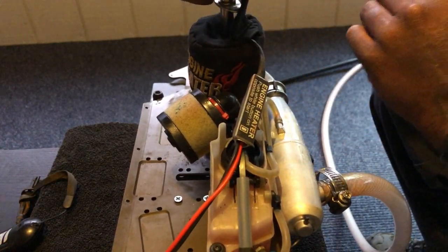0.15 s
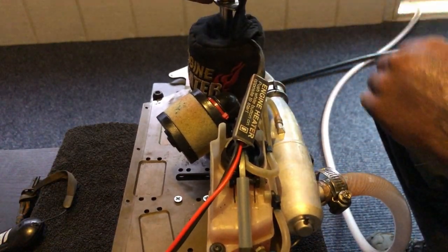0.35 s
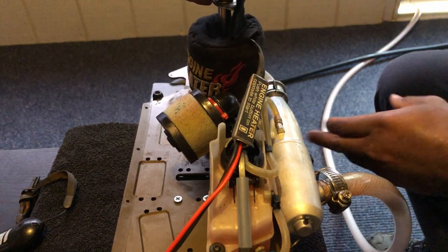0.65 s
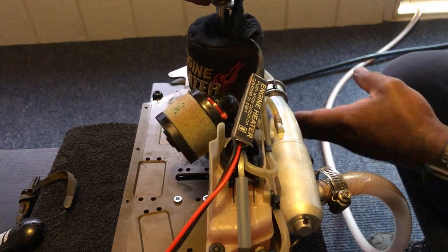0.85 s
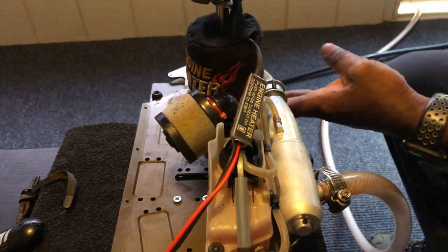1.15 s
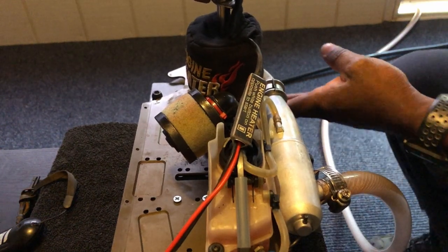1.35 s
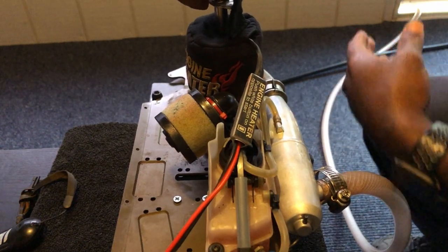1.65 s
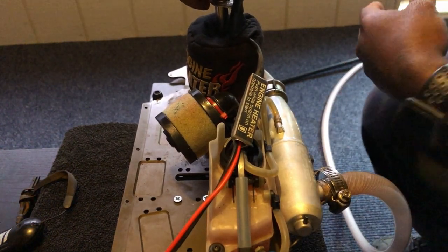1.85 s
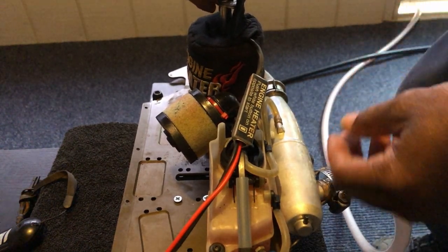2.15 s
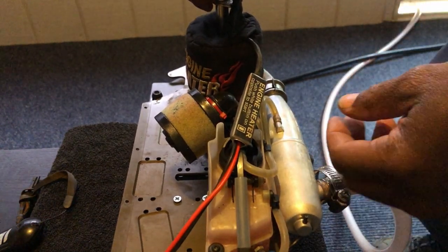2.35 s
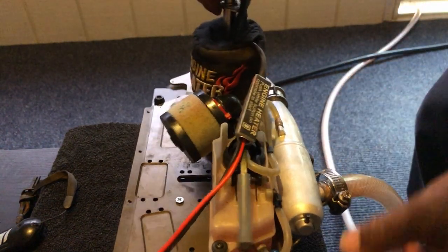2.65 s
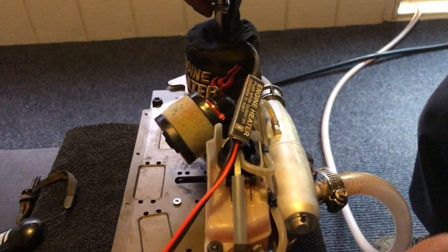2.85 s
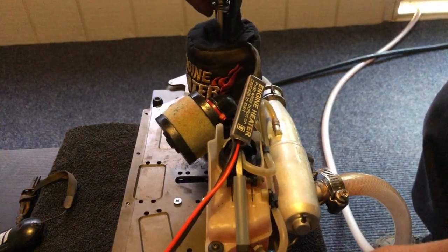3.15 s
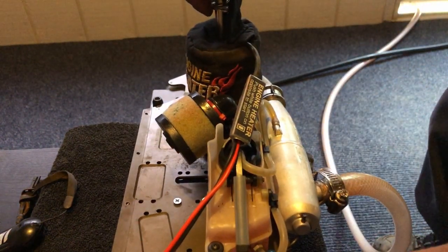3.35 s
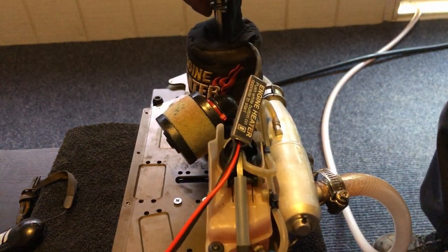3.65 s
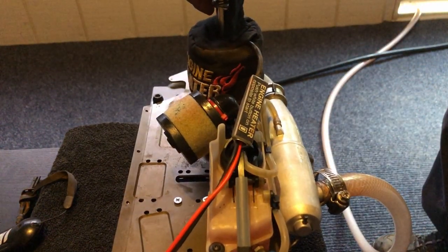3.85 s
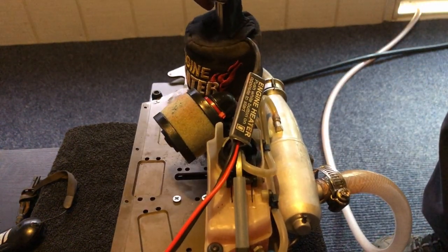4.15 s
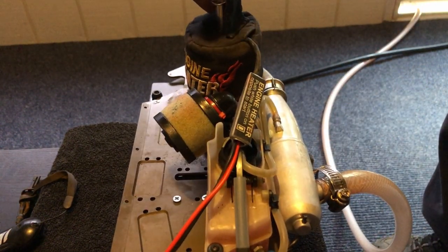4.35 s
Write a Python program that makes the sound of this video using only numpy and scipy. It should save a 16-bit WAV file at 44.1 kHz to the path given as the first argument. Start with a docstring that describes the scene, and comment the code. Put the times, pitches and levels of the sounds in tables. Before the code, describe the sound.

Low microphone knocks, finger taps and a metal snap, then an electric starter noisily cranks a small engine and whines down.

```python
"""In a small room, close by: a hand fiddles with a small model-boat engine, bumping the microphone.
Fingers tap and rustle and a metal part snaps home, over air noise and a faint beating hum.
The background drops; a hand-held electric starter bites and cranks the engine for over a second, gears clacking.
It lets go: the engine groans and clatters to a stop while the freed motor whines down.
Shaped noise gives the contacts and air, resonances the bodies, and speed-locked tones the teeth and motor."""
import sys
import numpy as np
from scipy import signal
from scipy.fft import rfft, irfft
from scipy.io import wavfile
from scipy.ndimage import uniform_filter1d

SR = 44100
rng = np.random.default_rng(int(sys.argv[2]) if len(sys.argv) > 2 else 0)


def to_wav(s):
    """Save 16-bit WAV."""
    ch = np.atleast_2d(s).T  # columns
    pcm = np.round(np.clip(ch, -1, 1) * 32767)  # PCM
    wavfile.write(sys.argv[1], SR, pcm.astype(np.int16))


N = 198468
TIME = np.arange(N) / SR  # s

# Air noise of the place: (frequency [Hz], level [dB])
AIR_COLOUR = [(41, -48.5), (70, -6), (126, -11.5), (186, -14), (262, -13), (286, -14), (336, -19),
              (541, -19), (1070, -27.5), (1230, -26.5), (3000, -37), (3900, -36.5), (5500, -38),
              (8280, -37.5), (12000, -42.5), (16000, -46)]
AIR_DB = -49
# Two hum tones that beat: (frequency [Hz], rms level [dB])
HUM = [(243.2, -50), (267.5, -47)]
# Faint wavering whines in the room: (frequency [Hz], width [Hz], rms level [dB])
ROOM_WHINES = [(1225, 7, -70.5), (1645, 35, -69.5), (5798, 20, -78)]
# Decay of the room's reflections: (frequency [Hz], 60 dB decay time [s])
ROOM_DECAY = [(200, 0.25), (1000, 0.15), (7000, 0.2), (15000, 0.35)]
HUSH_START = 2.018  # s

# Rumble at the microphone: (frequency [Hz], level [dB])
RUMBLE_COLOUR = [(5.9, -38.5), (10, -2), (20, 7.5), (29, -15), (41, -7), (59, -23), (120, -38),
                 (160, -56.5), (260, -120)]
# The microphone sways in the hand: (time [s], level [dB], rise [s], fade [s])
SWAYS = [(.34, -16.5, 0.038, 0.071), (.55, -12, 0.075, .13), (.82, -23, 0.089, 0.15),
         (1.28, -22, 0.1, 0.16), (1.44, -14.5, 0.06, 0.06), (1.74, -26, 0.078, 0.085),
         (2.38, -29, 0.15, .12), (3.16, -19, 0.045, 0.067), (3.34, -27.5, 0.047, 0.1),
         (3.82, -24, 0.084, .05), (4.25, -39, 0.16, 0.17)]
SWAY_FLOOR_DB = -41.5
# Low knocks on the microphone: (time [s], level [dB], half-length [s])
KNOCKS = [(0.351, -7.5, 0.012), (0.388, -11, 0.0075), (0.44, -21, .008), (0.524, -13, 0.005),
          (0.556, -7.5, 0.0074), (0.574, -13, 0.0038), (0.625, -15, .008), (0.664, -11, .015),
          (0.785, -25, 0.0058), (1.224, -19, .012), (1.419, -8, 0.008)]

# A metal part snaps home and bounces: (time [s], relative level [dB])
SNAP = [(1.2152, -8.5), (1.2164, -22), (1.2181, -15.5), (1.2200, -13.5)]
# Bright contact of the snap: (frequency [Hz], level [dB])
SNAP_COLOUR = [(410, -50), (700, -18.5), (1560, -22), (3940, -16), (4920, -18.5), (5540, -10), (6150, -16),
               (7890, 3.5), (9230, -18), (10300, -6.5), (10900, -20), (12200, -16.5), (13500, -9.5),
               (14600, -20), (16000, -16.5)]
# Frame ringing under the snap: (frequency [Hz], width [Hz], level [dB])
SNAP_BODY = [(420, 39, -6.5), (540.4, 27, 1), (1260, 60, -4.5), (2094, 82, -8)]
# Longer echo of the snap: (frequency [Hz], level [dB])
SNAP_ECHO = [(410, -30), (700, -10), (934, -18), (1140, -2), (1480, -15.5), (1870, -8.5), (2770, -15.5),
             (7490, -1.5), (12000, -16), (13500, -11), (14600, -20), (16000, -21)]
# Small finger taps: (time [s], relative tick level [dB], relative thud level [dB])
TAPS = [(0.047, -46, -62), (0.163, -51, -65), (0.7133, -50, -56), (1.074, -53, -63), (1.521, -47.5, -62),
        (1.698, -46, -39), (1.881, -36, -47), (1.99, -62, -46)]
# Tick of a light tap: (frequency [Hz], level [dB])
TICK_COLOUR = [(400, -0.5), (1500, -9.5), (3000, -6), (9000, -16), (15000, -20.5)]
# Thud of the tapped frame: (frequency [Hz], level [dB])
THUD_COLOUR = [(250, -13.5), (540, 1), (800, -9), (1300, -14), (2500, -25), (5000, -50)]
# Sleeve and hand rub: (time [s], relative level [dB], rise [s], fade [s])
RUBS = [(.04, -61, 0.017, 0.018), (.36, -58, 0.017, .15), (.54, -57, .08, 0.027), (.72, -54, .01, 0.035),
        (1.378, -47.5, 0.029, 0.12), (1.82, -46, 0.098, 0.065), (1.89, -37.5, 0.011, 0.057)]
# Rustle of the rub: (frequency [Hz], level [dB])
RUSTLE_COLOUR = [(180, -12.5), (300, -2.5), (870, -5.5), (1030, -7.5), (1320, -7), (3130, -14.5),
                 (4400, -16.5), (5500, -19), (9090, -21), (16000, -42.5)]
# A sleeve swishes past: (time [s], level [dB], rise [s], fade [s])
SWISH = (0.42, -56.5, 0.06, .17)
# Tone of the swish: (frequency [Hz], level [dB])
SWISH_COLOUR = [(1500, -14.5), (4000, -3), (8500, 1.5), (12000, -5.5), (16000, -14)]

# Faint ticks as the starter is lined up: (time [s], level [dB])
LINING_UP_TICKS = [(2.118, -64), (2.231, -61), (2.507, -66), (2.534, -60), (2.56, -56)]
# The coupling touches, skids and slips under load: (time [s], level [dB], rise [s], fade [s])
SKIDS = [(2.572, -44, .0005, 0.005), (2.594, -47, 0.0058, .006), (2.599, -40, .001, .005),
         (2.609, -34.5, 0.004, 0.011), (2.632, -34.5, 0.0092, 0.0069), (2.671, -24.5, .0007, 0.005),
         (2.678, -25, .0007, .003), (2.692, -26, .0007, .003), (2.9, -26, 0.012, 0.016)]
# Scrape of the skidding coupling: (frequency [Hz], level [dB])
SKID_COLOUR = [(150, -12), (500, 10.5), (900, 6.5), (1800, -4.5), (3200, -3), (5000, -8), (8500, -5.5),
               (11000, -15), (16000, -17)]
# The starter bites: (time [s], relative level [dB])
JOLTS = [(2.649, -29.5), (2.663, -17), (2.672, -16.5), (2.677, -10.5), (2.681, -13), (2.692, -11.5),
         (2.706, -18), (2.76, -16)]
# Body of the jolts: (frequency [Hz], level [dB])
JOLT_COLOUR = [(88, -56), (150, -5), (286, -12.5), (475, 3.5), (716, 1), (960, -22.5), (1260, -7.5),
               (2020, -24), (3220, -22), (3550, -60), (4080, -21), (9080, -25.5), (16000, -41)]
# The coupling squeals as it takes up the load: (time [s], pitch [Hz], level [dB])
SQUEAL = [(2.69, 7020, -57), (2.705, 7600, -41), (2.725, 8400, -33), (2.745, 9130, -38), (2.76, 9400, -43),
          (2.82, 8900, -49)]

BITE_S, LET_GO_S, FREE_S = 2.664, 3.925, 3.968  # the starter bites, is let go, spins free
BITE_RISE_S = 0.0071
GRIP_S, RELEASE_S = 0.064, 0.028  # the drive tones build up and die away
# Cranking speed: (time [s], tooth rate [teeth/s])
SPEED = [(2.75, 118.8), (2.772, 123.3), (2.8, 126.1), (2.83, 127.0), (2.872, 125.4), (3.024, 129.4),
         (3.118, 133.4), (3.162, 134.2), (3.292, 133.4), (3.356, 134.4), (3.434, 136.8), (3.506, 141.5),
         (3.564, 144.3), (3.782, 150.8), (3.838, 151.6), (3.89, 153.9), (3.91, 153.6)]
SPIN_UP_HZ_PER_S, BRAKE_HZ_PER_S = 340, 700  # tooth rate gained after the bite, lost after letting go
MID_SPEED_HZ = 135  # tooth rate
TEETH = 9  # per turn of the shaft
BLOW_DECAY = 0.22  # share of a tooth period
# Broad growl of the housing: (frequency [Hz], level [dB])
HOUSING_COLOUR = [(53, -19), (90, -8), (135, -20), (199, -7), (254, -12.5), (305, -3), (433, 1.5),
                  (647, 2.5), (817, -1), (1160, -3.5), (1450, -8.5), (1630, -12.5), (2000, -23),
                  (2600, -31), (4400, -120)]
GROWL_DB, GROWL_DB_PER_OCTAVE = -36.5, -10  # at mid speed; the engine labours less as it frees up
GROWL_FADE_S = 0.07  # the housing falls quiet once the load is off
# Housing resonances: (frequency [Hz], width [Hz], level [dB])
HOUSING_MODES = [(135, 92, -38), (242.5, 63, -41), (374.5, 25, -38), (435, 35.6, -34), (470, 17, -36),
                 (507.6, 32, -35.5), (588, 33, -33), (634, 27, -38.5), (667.5, 44, -35.5), (752, 58, -44.5),
                 (890, 90, -48.5), (1120, 52, -41.5), (1315, 160, -47), (1614, 106, -43.5),
                 (1740, 190, -45), (2250, 90, -53), (2513, 76, -51.5), (2970, 250, -53.5),
                 (3700, 130, -50.5)]
# Broad colour of the gears: (frequency [Hz], level [dB])
GEAR_COLOUR = [(590, -36), (1000, -14.5), (1160, 5), (1470, -22), (1650, 0), (1910, -6), (2470, 0),
               (4360, -7.5), (4520, -9), (5130, -2.5), (5500, -6.5), (8450, -10), (9490, -8.5),
               (11600, -9.5), (16000, -16.5)]
# Gear-case resonances: (frequency [Hz], width [Hz], level [dB])
GEAR_MODES = [(2485, 78, -3.5), (2960, 120, -8), (3320, 150, -5.5), (3700, 140, -3), (4076, 130, 0.5),
              (4340, 70, -4.5), (4610, 105, 4), (5020, 280, 3.5), (6010, 180, -9), (6590, 64, -12),
              (8360, 670, 1.5), (8850, 100, -4)]
RATTLE_DB, RATTLE_DB_PER_OCTAVE = -31, 8.5  # at mid speed, before the teeth seat
SEAT_DB, SEAT_S = -7.5, 0.33  # the gear case rings weakly until the teeth have seated
# Buzz of the meshing teeth: (multiple of tooth rate [1], level [dB])
BUZZ = [(13, -1), (19, -7), (23, -3.5), (25, -2), (28, -8), (31, 3.5), (33, -3), (36, -1), (38, -1),
        (40, -2), (64, -8)]
# Standout shaft orders: (multiple of shaft rate [1], level against a plain tooth harmonic [dB],
# slope [dB per octave of speed])
SHAFT_ORDERS = [(9, -1.5, 0), (12, -4.5, -25), (13, -7.5, -15), (16, -1, -50), (27, 0, 22), (30, -6, 0),
                (31, -5, 0), (36, -2, -45), (37, -7, 40), (38, -4, 10), (39, 4, 8), (40, -7, 15),
                (41, -7, 30), (42, -7, 40), (43, -9, 70), (45, 1.5, 0), (48, -1, -20), (60, 2, -20),
                (108, 0, 10), (117, -2, 0), (126, -8, 0), (135, 4, 15), (153, 0, 40), (171, -4, 15),
                (180, -2, 35), (207, 0, 25), (261, 3, 0), (270, 6, 15), (279, 6.5, 15), (288, 2, 25),
                (297, -4, 0), (306, 2.5, -20), (315, 2.5, 0), (324, 3.5, -5), (333, 6.5, -15), (342, 2, 10),
                (360, 0, -35)]
# Bearing whistles: (multiple of tooth rate [1], level before the shell's gain [dB])
BEARING = [(75.5, -45), (80, -46), (83.5, -44)]
# Gain of the bearing shell: (frequency [Hz], gain [dB])
BEARING_SHELL = [(10200, -12), (11300, 1.5), (12400, -2.5), (13300, -14)]
# Rough whines of the loaded motor: (multiple of tooth rate [1], level up to mid speed [dB])
MOTOR_WHINES = [(21.1, -48), (21.7, -53), (23.1, -47.5), (24.55, -48)]
WHINE_DB_PER_OCTAVE = -20  # above mid speed: they ease as the engine frees up
# Clack of slack teeth: (frequency [Hz], level [dB])
CLACK_COLOUR = [(590, -44), (1000, -9), (1310, -5), (1910, -9), (2230, 1.5), (3300, -4), (4100, 5),
                (4500, 6), (5830, -12), (8070, -11), (9380, -30), (16000, -37)]
CLATTER_S, CLATTER_DB, CLATTER_RISE_S, CLATTER_FADE_S = 3.982, -26, 0.05, 0.035  # as the engine stops

# The engine groans through its last turns: (time [s], level [dB], rise [s], fade [s])
GROAN = (3.975, -35, 0.022, 0.025)
GROAN_HZ, GROAN_SAG_HZ_PER_S = 460, 700  # from the moment of letting go
# The frame shudders as the engine stops: (time [s], level [dB], rise [s], fade [s])
STOP = (3.99, -38, 0.05, 0.06)
# Whine of the free motor; the drag eases as it slows
COAST_HZ, COAST_SAG_HZ_PER_S, COAST_EASE_HZ_PER_S2 = 3195, 4850, 1200
COAST_DB, COAST_FADE_DB_PER_S = -37.5, 42  # before the case's gain
HISS_DB, HISS_FADE_DB_PER_S = -36.5, 35
WHIRR_DB, WHIRR_FADE_DB_PER_S = -38.5, 21.5  # for each layer's own level to add to
# Gain of the motor case: (frequency [Hz], gain [dB])
MOTOR_CASE = [(900, 9), (1500, -0.5), (2300, 1), (2800, 1.5), (3300, -2), (4200, -11), (6000, -21)]
# Hiss of the coasting motor: (frequency [Hz], level [dB])
COAST_HISS = [(590, -30), (1000, -9), (1420, -5), (1790, -12), (1960, -8.5), (2410, -2.5), (3460, -10.5),
              (4790, -16), (5830, -20), (6860, -19), (7900, -10), (9200, -18), (10200, -13), (15100, -32),
              (16000, -40)]
# Broad whirr of the coasting motor's body: (frequency [Hz], level [dB])
WHIRR_COLOUR = [(60, -22), (150, -7), (300, -10), (450, -1), (700, 3.5), (950, -1), (1600, -29),
                (2500, -31)]
# Starter body, shaken by the coasting motor: (frequency [Hz], width [Hz], level [dB])
MOTOR_BODY = [(427, 32, -3.5), (573, 32, -1), (715, 37, 2), (909, 43, 1.5), (1130, 60, -5)]
EDGE_HZ = 15900  # top of the recorder's band


def amp(db):
    """Decibels to gain."""
    return 10 ** (np.asarray(db) / 20)


def unit(x):
    """Scales to rms 1."""
    return x / np.sqrt(np.mean(x ** 2) + 1e-20)


def curve(rows, axis=1):
    """One column of a table, joined by straight lines in time."""
    rows = np.asarray(rows)
    return np.interp(TIME, rows[:, 0], rows[:, axis])


def read(points, hz):
    """A table's value at any frequency, joined by straight lines on a log scale."""
    f, value = np.transpose(points)
    return np.interp(np.log(hz + 1), np.log(f + 1), value)


def since(s):
    """Seconds gone by since s, zero before."""
    return np.maximum(TIME - s, 0)


def swell(s, db, rise, fade):
    """A level that grows to its peak at s and dies away."""
    return amp(db) * np.exp(-np.maximum((s - TIME) / rise, (TIME - s) / fade))


def swells(rows):
    """The joint level of several swells, added as powers."""
    return np.sqrt(sum(swell(*row) ** 2 for row in rows))


def noise():
    """White noise."""
    return rng.standard_normal(N)


def drift(hz):
    """Slow chance of rms 1, up to about hz."""
    softened = rfft(noise()) * np.exp(-(np.fft.rfftfreq(N, 1 / SR) / hz) ** 2)
    return unit(irfft(softened, N))


def wander(per_s):
    """Slow chance of rms about 1: random heights joined by straight lines."""
    knots = np.arange(-rng.random() / per_s, TIME[-1] + 1, 1 / per_s)
    return np.interp(TIME, knots, np.sqrt(3 / 2) * rng.standard_normal(len(knots)))


def tint(x, points):
    """Causal minimum-phase filter with the given spectrum and unit energy."""
    db = np.maximum(read(points, abs(np.fft.fftfreq(8192, 1 / SR))), -100)
    log_gain = np.log(amp(db))
    taps = np.fft.ifft(np.exp(np.conj(signal.hilbert(log_gain)))).real[:4096]
    return signal.oaconvolve(x, taps / np.linalg.norm(taps))[:len(x)]


def ring(x, modes):
    """Excites a bank of decaying resonances; wider ones die sooner."""
    t = TIME[:SR // 4]
    impulse = np.zeros(len(t))
    for hz, width, db in modes:
        decay = np.exp(-np.pi * width * t)
        impulse += amp(db) * np.sqrt(width) * decay * np.sin(2 * np.pi * hz * t)
    return signal.oaconvolve(x, impulse / np.linalg.norm(impulse))[:N]


def response(modes, hz):
    """Gain of a bank of resonances at the given frequencies."""
    power = 0
    for centre, width, db in modes:
        power = power + (amp(db) / (1 + ((hz - centre) / (width * 0.56)) ** 2)) ** 2
    return np.sqrt(power)


def bursts(rows, decay):
    """A short dying burst of contact noise at each time and level; decay in seconds."""
    hits = np.zeros(N)
    for s, db in rows:
        hits[round(s * SR)] += amp(db)
    return signal.lfilter([1], [1, -np.exp(-1 / (decay * SR))], hits) * noise()


def whistle(hz, width_hz):
    """A rough tone of rms 1 that follows a pitch curve."""
    angle = 2 * np.pi * np.cumsum(hz) / SR
    return drift(width_hz) * np.cos(angle) + drift(width_hz) * np.sin(angle)


def room(x, wet_db):
    """The sound plus a short tail of sparse reflections, each frequency dying at its own rate."""
    count = SR // 2
    sparse = rng.random(count) < 4000 / SR  # about 4000 reflections per second
    taps = rng.choice([-1., 1.], count) * sparse * (TIME[:count] > 0.003)
    hz, t, z = signal.stft(taps, SR, nperseg=256)
    decay = amp(-60 * t / read(ROOM_DECAY, hz)[:, None])
    tail = signal.istft(z * decay, SR, nperseg=256)[1]
    return x + amp(wet_db) * signal.fftconvolve(x, tail / np.linalg.norm(tail))[:N]


def room_tone():
    """Steady air noise, a beating hum of two close tones and faint wavering whines."""
    hum = np.zeros(N)
    for hz, db in HUM:
        hum += amp(db) * np.sin(2 * np.pi * (hz * TIME + rng.random()) + 0.071 * drift(6))
    whines = sum(amp(db) * whistle(np.full(N, hz), width) for hz, width, db in ROOM_WHINES)
    air = amp(AIR_DB) * unit(tint(noise(), AIR_COLOUR))
    return np.sqrt(2) * hum + whines + air


def handling():
    """Low rumble and soft pushes on the microphone body."""
    hz = np.fft.rfftfreq(N, 1 / SR)
    spectrum = rfft(noise()) * amp(read(RUMBLE_COLOUR, hz)) * (hz < RUMBLE_COLOUR[-1][0])
    sway = signal.hilbert(irfft(spectrum, N))
    evened = unit(sway.real / np.sqrt(np.hypot(abs(sway), sway.std() / 2)))  # milder peaks and gaps
    out = evened * np.hypot(swells(SWAYS), amp(SWAY_FLOOR_DB))
    for s, db, length in KNOCKS:
        u = (TIME - s) / length
        out += amp(db) * (1 - u ** 2) / (1 + u ** 2 / 3) ** 3  # a push with a dip on either side
    return out


def metal_snap():
    """Contact bursts of a part snapping home, the frame ringing under them and a longer echo."""
    strikes = bursts(SNAP, decay=0.0013)
    contact = amp(2.5) * tint(strikes, SNAP_COLOUR)
    frame = amp(-19.5) * ring(strikes, SNAP_BODY)
    echo = tint(bursts([(SNAP[-1][0], -34)], decay=0.034), SNAP_ECHO)
    return contact + frame + echo


def fingers():
    """Small taps as ticks and thuds in the room, and the gritty noise of a rubbing, swishing sleeve."""
    ticks = tint(bursts([(s, db) for s, db, _ in TAPS], decay=0.0037), TICK_COLOUR)
    thuds = tint(bursts([(s, db) for s, _, db in TAPS], decay=0.0037), THUD_COLOUR)
    taps = room(amp(-1) * ticks + thuds, wet_db=1.5)
    rub_grit = noise() * amp(1.5 * drift(200))
    rub = amp(-1) * unit(tint(rub_grit, RUSTLE_COLOUR)) * swells(RUBS)
    swish_grit = noise() * amp(2.48 * drift(156))
    swish = unit(tint(swish_grit, SWISH_COLOUR)) * swell(*SWISH)
    return taps + rub + swish


def take_up():
    """The coupling ticks and skids in short scrapes, then jolts and squeals as the starter bites."""
    grit = noise() * amp(2.8 * drift(294))
    skid = unit(tint(grit, SKID_COLOUR)) * swells(SKIDS)
    ticks = tint(bursts(LINING_UP_TICKS, decay=0.0018), TICK_COLOUR)
    sounding = (TIME > SQUEAL[0][0]) * (TIME < SQUEAL[-1][0])
    squeal = whistle(curve(SQUEAL), width_hz=480) * amp(curve(SQUEAL, axis=2)) * sounding
    jolts = amp(-2) * tint(bursts(JOLTS, decay=0.004), JOLT_COLOUR)
    return skid + ticks + squeal + jolts


def groan():
    """A short, unsteady falling tone as the engine brakes."""
    hz = np.maximum(GROAN_HZ - GROAN_SAG_HZ_PER_S * since(LET_GO_S), 100)
    return swell(*GROAN) * np.sqrt(2) * np.sin(2 * np.pi * np.cumsum(hz + 9 * wander(60)) / SR)


def coast_whine(shake_db):
    """Whine, near-octave and shaft tone of the free motor fall through the case resonance."""
    t = TIME - FREE_S
    hz = np.clip(COAST_HZ - COAST_SAG_HZ_PER_S * t + COAST_EASE_HZ_PER_S2 * t ** 2, 100, 5000)
    whine = whistle(hz, width_hz=200) * amp(read(MOTOR_CASE, hz))
    octave_level = amp(-1.5 + read(MOTOR_CASE, 2 * hz) + shake_db * wander(35))
    octave = whistle(2.05 * hz, width_hz=270) * octave_level
    shaft = amp(-19) * whistle(hz / 13, width_hz=10)
    return whine + octave + shaft


def run_down(shake_db=2):
    """The freed motor whines, hisses and shakes its body as it coasts; the frame shudders at the stop."""
    coasting = since(FREE_S)
    whine_level = amp(COAST_DB - COAST_FADE_DB_PER_S * coasting) * (1 - np.exp(-coasting / RELEASE_S))
    whine = coast_whine(shake_db) * whine_level
    hiss = unit(tint(noise(), COAST_HISS)) * amp(HISS_DB - HISS_FADE_DB_PER_S * coasting)
    wash = amp(-5) * unit(tint(noise(), WHIRR_COLOUR))
    body = amp(-2) * unit(ring(noise(), MOTOR_BODY))
    whirr = (wash + body) * amp(WHIRR_DB - WHIRR_FADE_DB_PER_S * coasting + shake_db * wander(50))
    freed = np.interp(TIME, [LET_GO_S, FREE_S], [0, 1])
    shudder = swell(*STOP) * unit(ring(noise(), MOTOR_BODY))
    return (whine + hiss + whirr) * freed + shudder


def tooth_rate():
    """Teeth per second: spins up, cranks ever more freely and brakes once let go, never below 50."""
    early = np.maximum(SPEED[0][0] - TIME, 0)
    hz = curve(SPEED) - SPIN_UP_HZ_PER_S * early - BRAKE_HZ_PER_S * since(LET_GO_S)
    return np.maximum(hz, 50)


def tooth_blows(mesh, spread_db=2.5, rebound=0.17, slide=0.41):
    """Each tooth strikes, rebounds and slides; nine teeth a turn, each with its own strength."""
    tooth, within = mesh.astype(int), mesh % 1
    own = rng.standard_normal(TEETH)[tooth % TEETH]
    chance = rng.standard_normal(tooth[-1] + 1)[tooth]
    strike = np.exp(-within / BLOW_DECAY)
    strike += rebound * np.exp(-((within + 0.5) % 1) / BLOW_DECAY)  # half a tooth later
    return unit(slide + strike * amp(spread_db * (own + chance) / np.sqrt(2)))


def tooth_buzz(mesh):
    """The repeating part of each tooth blow: harmonics in loose step that waver as the mesh shifts."""
    out = np.zeros(N)
    for k in range(13, 64):
        slip = 0.22 * rng.standard_normal() + 0.05 * wander(30)  # cycles
        level = amp(read(BUZZ, k) + 1.8 * wander(8.2))
        out += level * np.cos(2 * np.pi * (k * mesh + slip))
    return unit(out)


def gear_case(x):
    """The broad colour of the gears plus the resonances of their case."""
    return unit(unit(tint(x, GEAR_COLOUR)) + amp(-3) * unit(ring(x, GEAR_MODES)))


def seating(x):
    """The ringing band of the gear case comes up as the teeth seat."""
    band_filter = signal.butter(2, [3300, 5400], "band", fs=SR, output="sos")
    band = signal.sosfiltfilt(band_filter, x)
    band_gain = amp(SEAT_DB * np.exp(-(since(BITE_S) / SEAT_S) ** 2))
    return x + band * (band_gain - 1)


def drive_tones(speed, mesh, octaves):
    """Tooth harmonics and shaft sidebands; each swells as the speed carries it through a resonance."""
    hz = np.arange(0, 7000, 2)
    gain = response(HOUSING_MODES, hz) + amp(-51.5) * response(GEAR_MODES, hz)
    orders = {order: -12 for order in range(24, 51)}  # weak sidebands [dB]
    orders.update({TEETH * k: 0 for k in range(1, 39)})  # plain tooth harmonics
    orders.update({order: db + slope * octaves for order, db, slope in SHAFT_ORDERS})
    out = np.zeros(N)
    for order, db in orders.items():
        multiple = order / TEETH
        unsteady = 1 + multiple / 36  # the higher the order, the more it comes and goes
        level = amp(db + 0.95 * unsteady * wander(22)) * np.interp(multiple * speed, hz, gain)
        smear = 0.055 * unsteady ** 2 * wander(80)  # rad
        out += level * np.sin(2 * np.pi * (multiple * mesh + rng.random()) + smear)
    return np.sqrt(2) * out


def bearing_whistle(speed):
    """Fuzzy whistles ride on the speed and swell where the bearing shell resonates."""
    out = np.zeros(N)
    for multiple, db in BEARING:
        hz = multiple * speed
        out += amp(db + read(BEARING_SHELL, hz)) * whistle(hz, width_hz=540)
    return out


def motor_whine(speed, octaves):
    """Rough whistles of the loaded motor that ride on the speed."""
    whines = sum(amp(db) * whistle(multiple * speed, width_hz=55) for multiple, db in MOTOR_WHINES)
    return amp(WHINE_DB_PER_OCTAVE * np.maximum(octaves, 0)) * whines


def starter():
    """Tooth blows shake the housing and gear case from the bite until the slack teeth clatter to a stop."""
    speed = tooth_rate()
    mesh = np.cumsum(speed * (1 + 0.0012 * drift(25))) / SR  # teeth passed
    octaves = np.log2(curve(SPEED) / MID_SPEED_HZ)
    blows = tooth_blows(mesh)
    engaged = np.exp(np.minimum(TIME - BITE_S, 0) / BITE_RISE_S)
    engaged *= np.clip((FREE_S - TIME) / RELEASE_S / 2 + 0.5, 0, 1)
    torque = (1 - np.exp(-since(BITE_S) / GRIP_S)) * np.exp(-since(LET_GO_S) / RELEASE_S)

    growl = amp(GROWL_DB + GROWL_DB_PER_OCTAVE * octaves) * unit(tint(blows * noise(), HOUSING_COLOUR))
    growl *= np.exp(-since(LET_GO_S) / GROWL_FADE_S)
    # the contact is a clean buzz in the middle and rough scraping in the treble
    scrape = tint(blows * noise(), [(1200, -1), (2000, -4), (5000, -4), (7000, 0)])
    contact = scrape + 0.39 * unit(tooth_buzz(mesh) * np.sqrt(blows))
    rattle = amp(RATTLE_DB + RATTLE_DB_PER_OCTAVE * octaves) * seating(gear_case(contact))

    drive = seating(drive_tones(speed, mesh, octaves))
    loaded = bearing_whistle(speed) * blows + drive + motor_whine(speed, octaves)
    clatter = unit(tint(blows ** 1.4 * noise(), CLACK_COLOUR))
    clatter *= swell(CLATTER_S, CLATTER_DB, CLATTER_RISE_S, CLATTER_FADE_S)
    return engaged * (growl + rattle) + torque * loaded + clatter


def scene():
    """Everything close by; room tone and finger sounds drop 21 dB about half a second before the start."""
    hush = uniform_filter1d(amp(-21 * (TIME > HUSH_START)), size=90)
    background = (room_tone() + metal_snap() + fingers()) * hush
    machine = room(take_up() + groan() + run_down() + starter(), wet_db=-9.5)
    return (background + machine + handling())[None]


def record(dry):
    """The recorder's band limit."""
    taps = signal.firwin(511, EDGE_HZ, window=("kaiser", 9), fs=SR)
    return signal.oaconvolve(dry, taps[None], "same")


dry = scene()
out = record(dry)
to_wav(out)
```